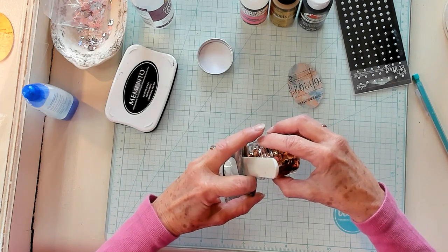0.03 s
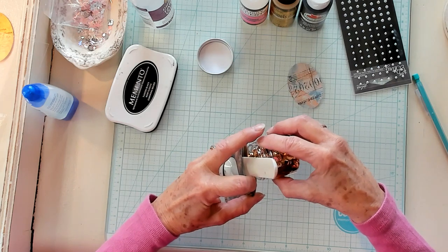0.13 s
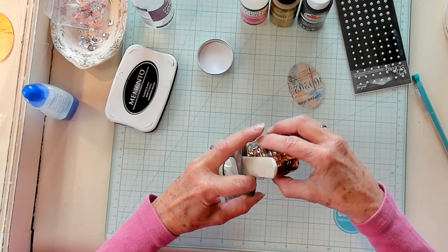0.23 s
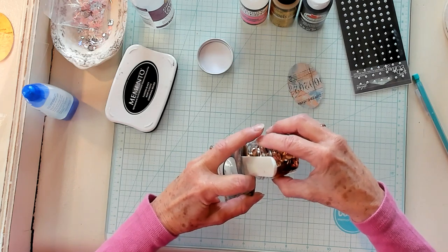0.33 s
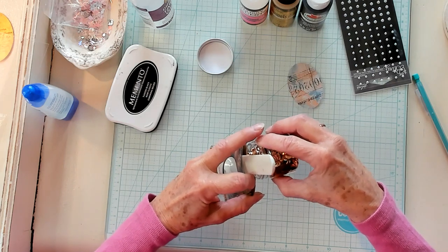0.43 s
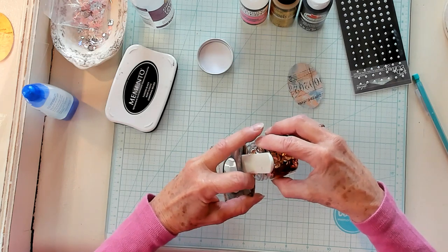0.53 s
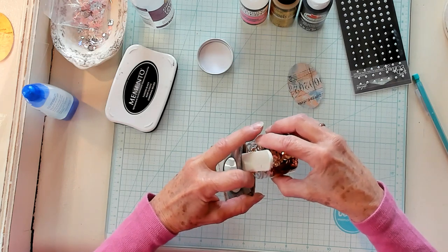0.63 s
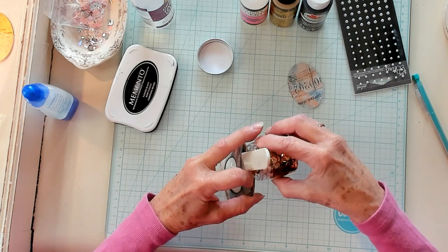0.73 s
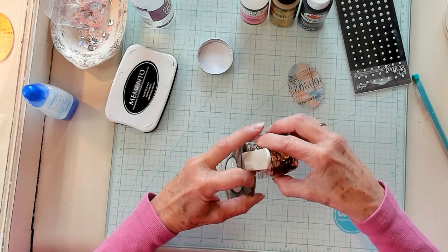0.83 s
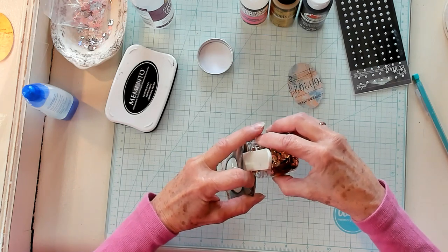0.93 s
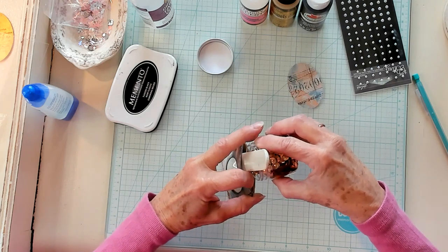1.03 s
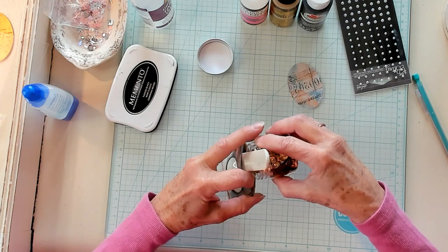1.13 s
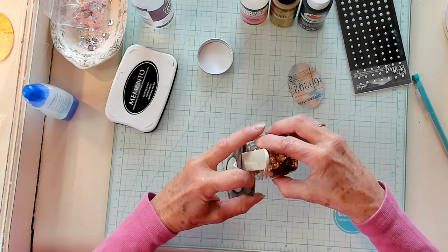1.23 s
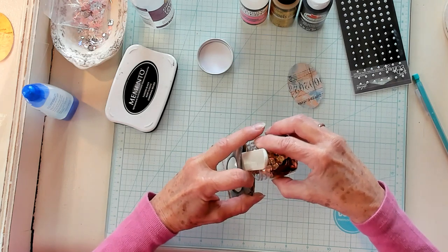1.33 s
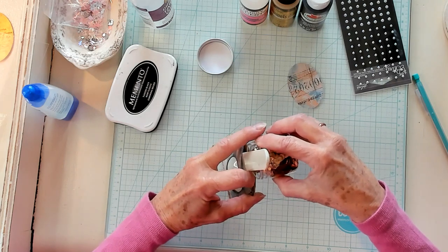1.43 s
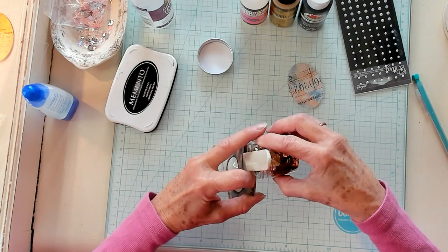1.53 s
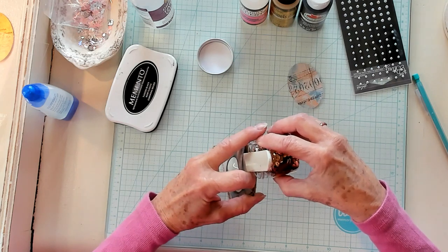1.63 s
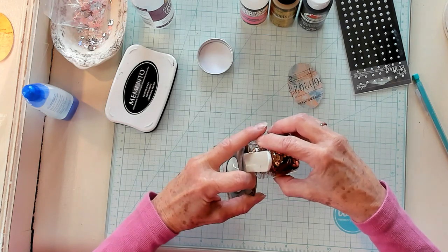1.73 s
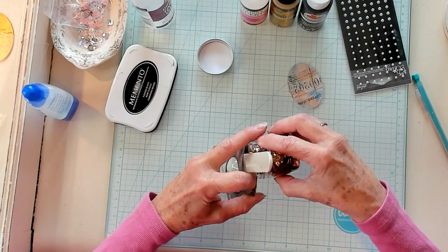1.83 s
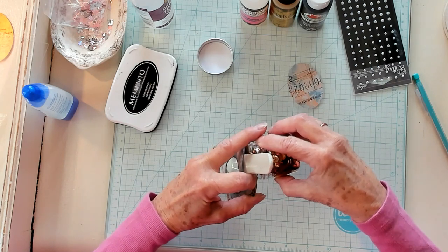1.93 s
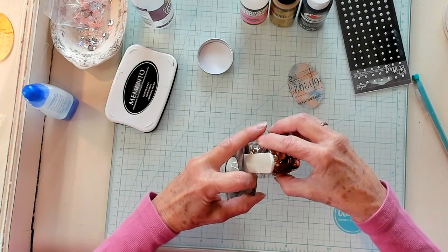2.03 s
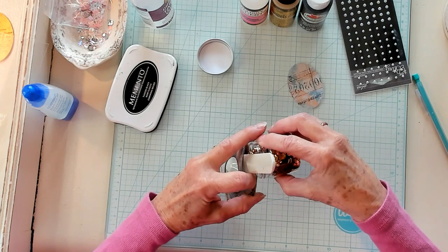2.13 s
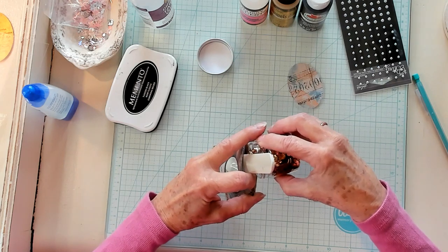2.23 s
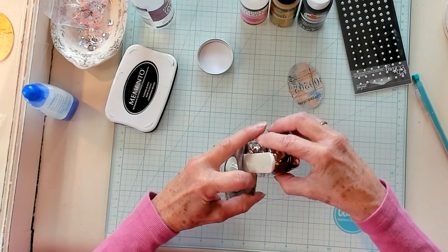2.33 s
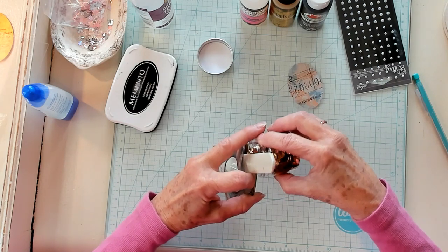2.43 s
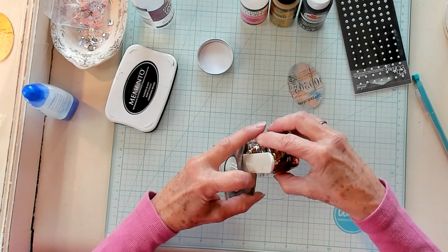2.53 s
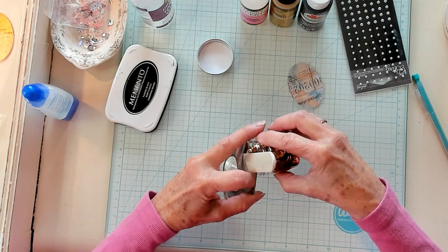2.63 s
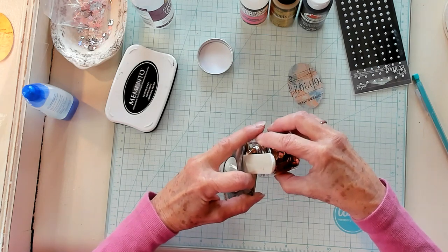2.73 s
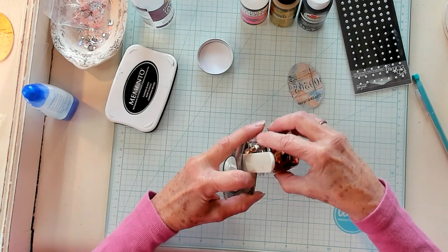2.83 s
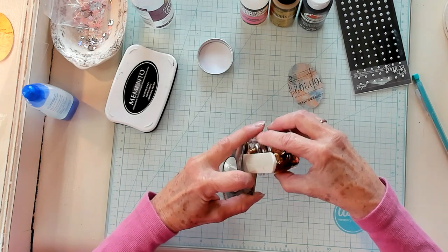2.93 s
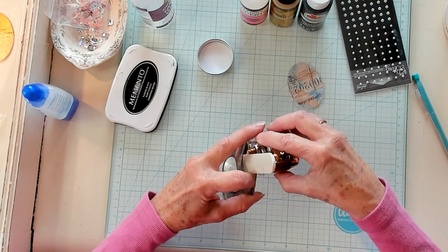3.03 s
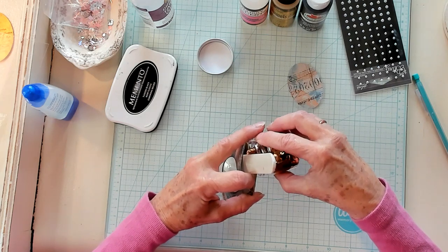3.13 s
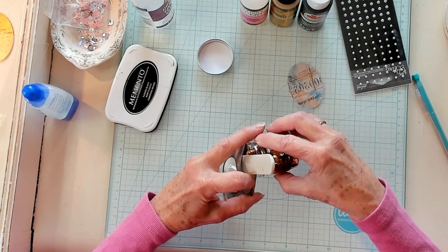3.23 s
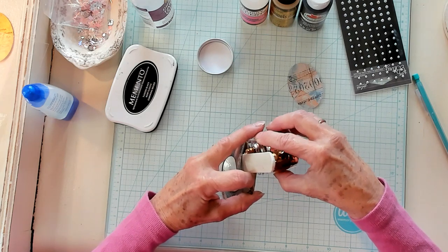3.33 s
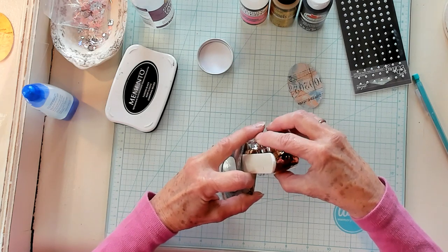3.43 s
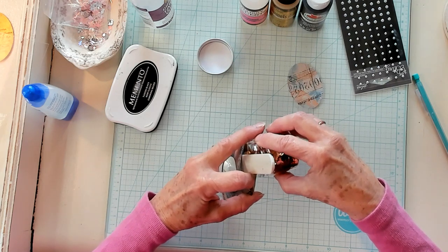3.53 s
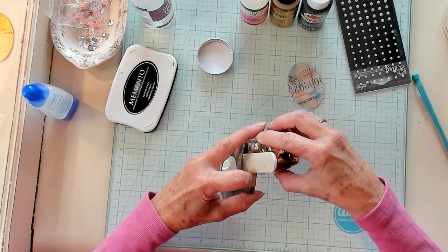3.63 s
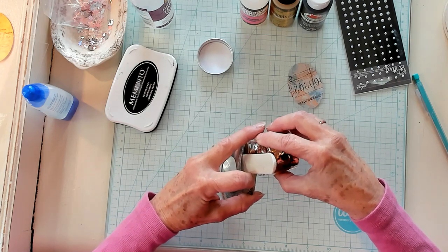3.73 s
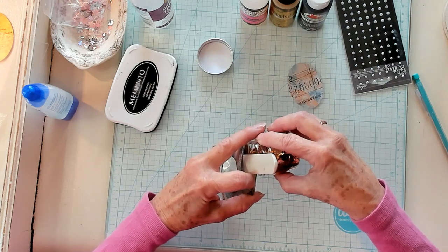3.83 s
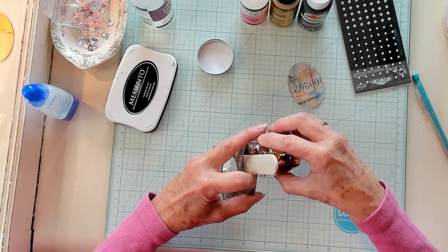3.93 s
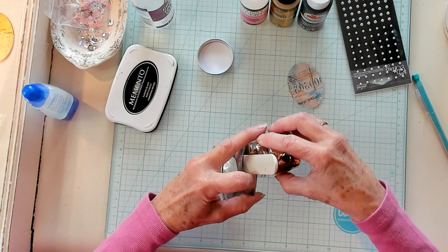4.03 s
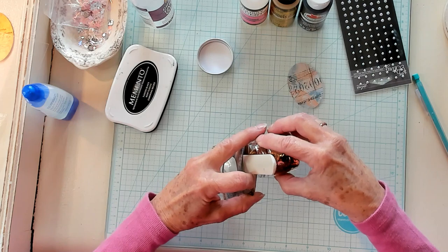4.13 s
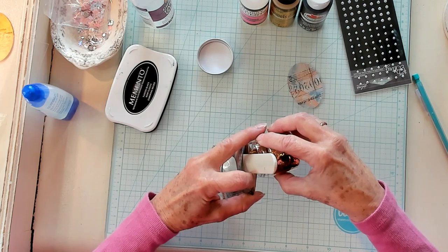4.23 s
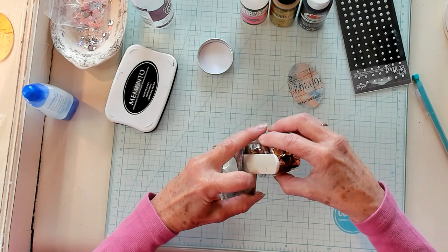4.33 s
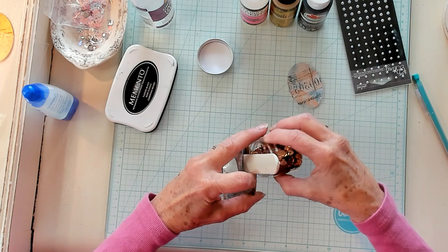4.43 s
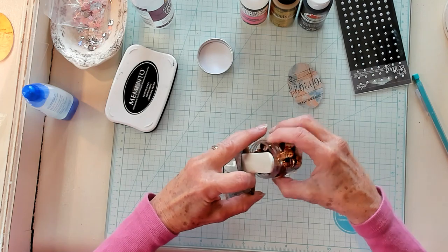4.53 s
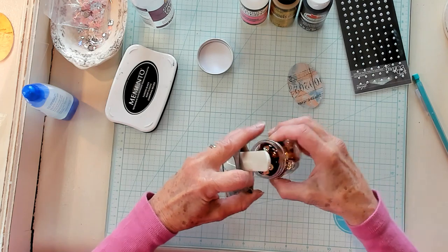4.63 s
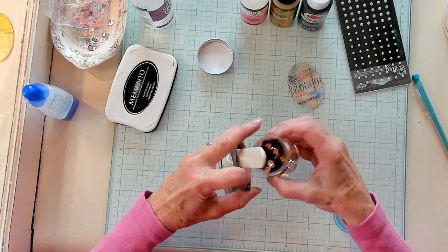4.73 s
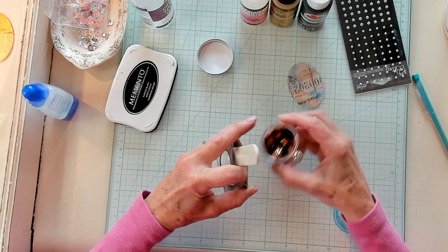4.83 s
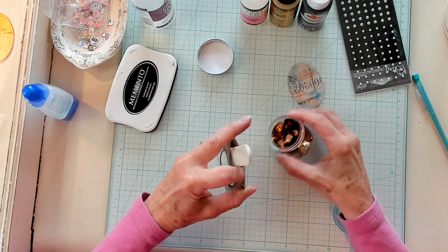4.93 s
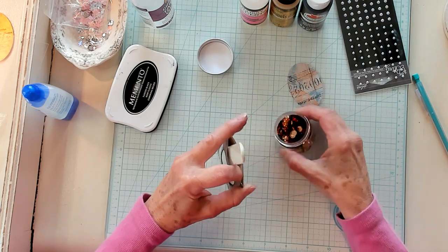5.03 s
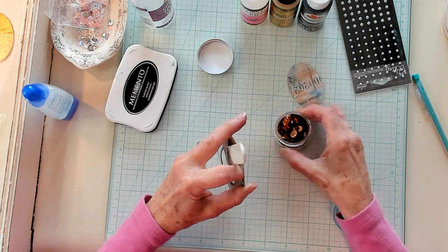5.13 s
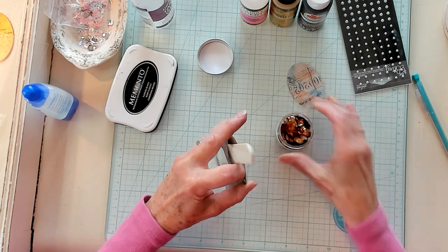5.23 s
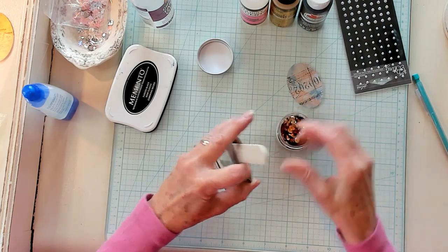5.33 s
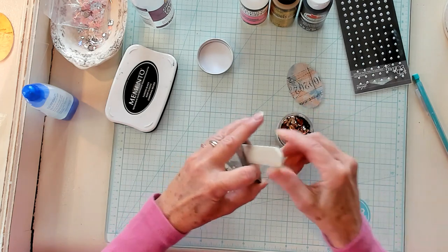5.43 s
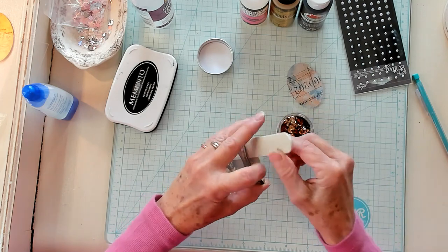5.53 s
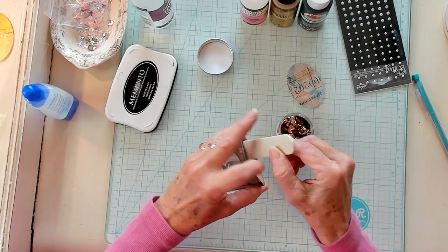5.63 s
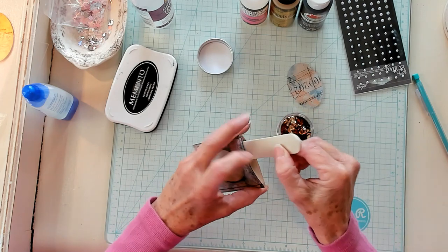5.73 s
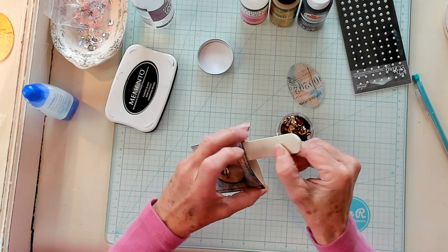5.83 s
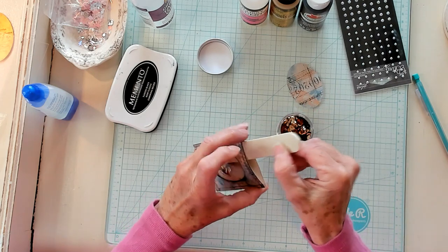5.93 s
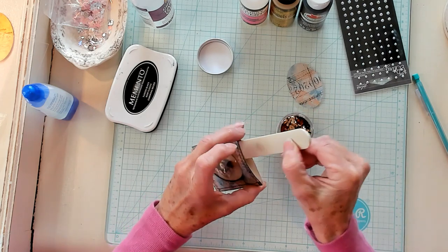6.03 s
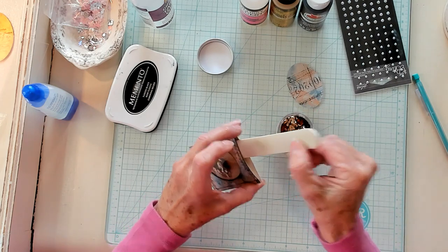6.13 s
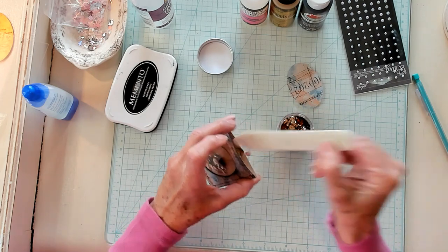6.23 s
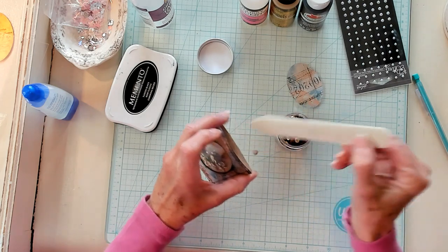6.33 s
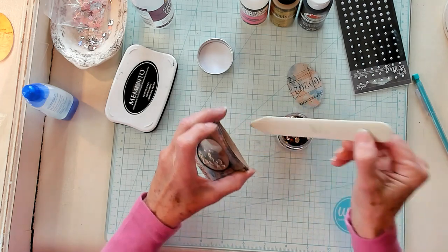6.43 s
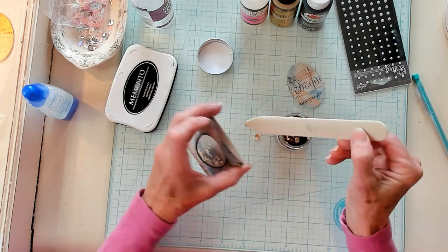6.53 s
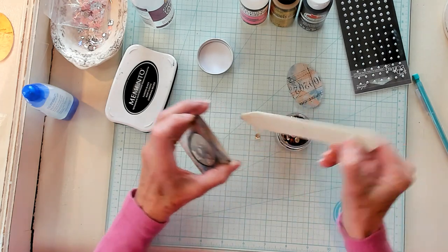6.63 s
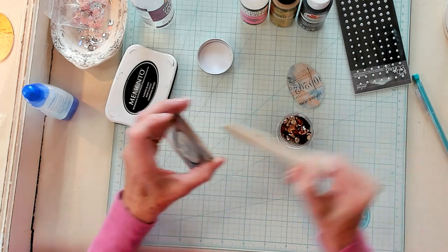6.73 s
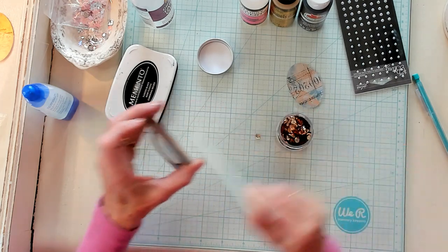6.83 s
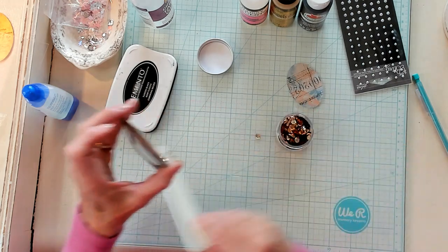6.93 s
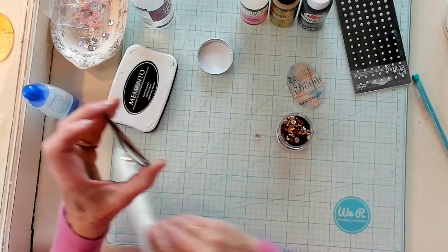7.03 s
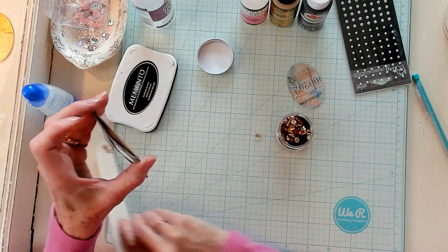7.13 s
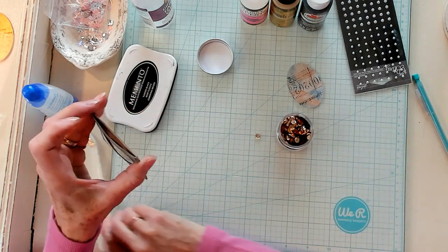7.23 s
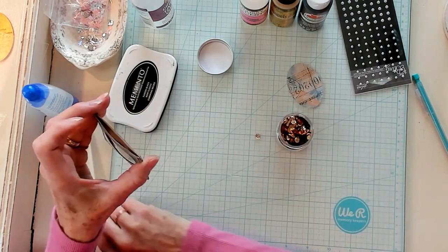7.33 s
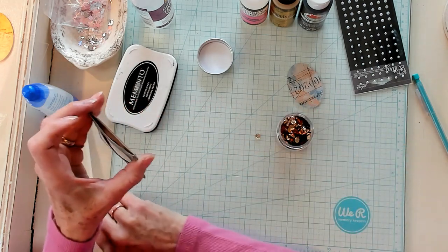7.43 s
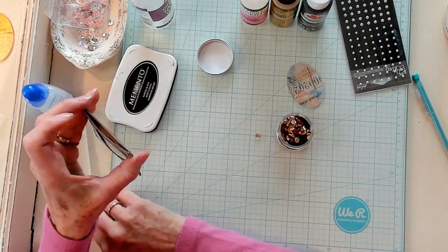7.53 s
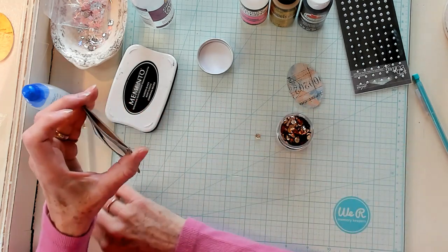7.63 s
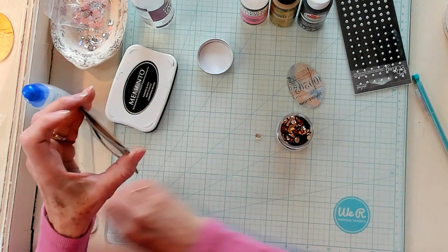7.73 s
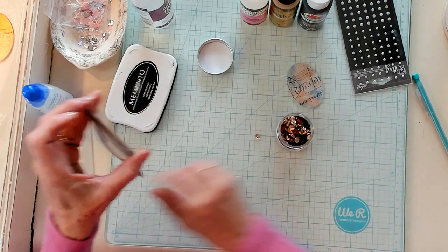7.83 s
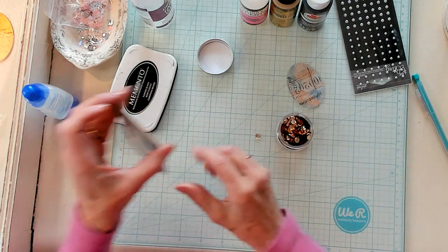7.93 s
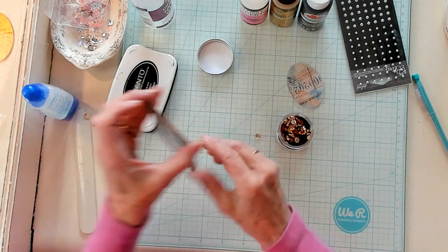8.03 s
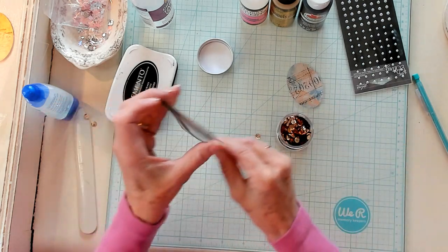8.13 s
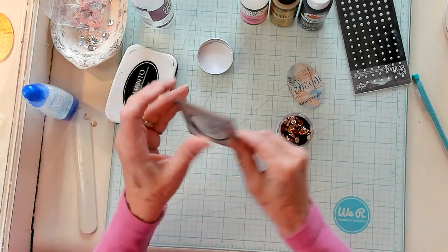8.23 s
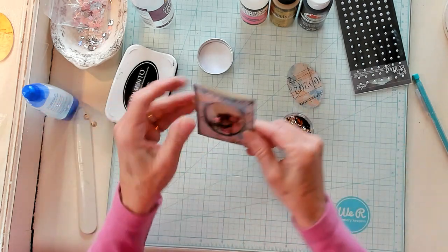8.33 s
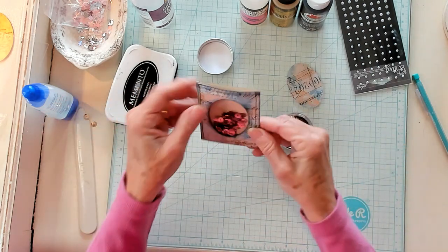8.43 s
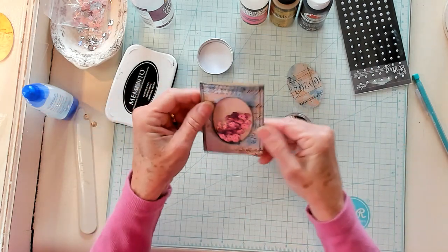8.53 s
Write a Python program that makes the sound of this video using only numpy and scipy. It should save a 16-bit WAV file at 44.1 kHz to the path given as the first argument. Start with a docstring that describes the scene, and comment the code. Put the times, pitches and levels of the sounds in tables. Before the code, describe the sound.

Sequins click and slide into a paper pocket, followed by a jar's knock, crinkling paper and a brief bright clatter.

```python
"""A desk in a small, faintly humming room, one microphone close by. For four seconds sequins are shaken
from a small jar into a paper pocket in short slides, each impact clicking and ringing jar and pocket.
Near 5 s the jar knocks down on the desk mat and a few last sequins tick. Paper fibres slip and creases
snap as a bone folder is drawn out of the pocket. From 7 s the folder taps, slides and clatters to rest,
ringing itself and the desk; then the paper rustles again."""
import sys
import numpy as np
from scipy import signal
from scipy.fft import rfft, irfft
from scipy.io import wavfile
from scipy.ndimage import uniform_filter1d

SR = 44100
rng = np.random.default_rng(int(sys.argv[2]) if len(sys.argv) > 2 else 0)


def file_out(sig):
    """Save sig as 16-bit WAV at sys.argv[1]."""
    # one column per channel
    cols = np.atleast_2d(sig).T
    # limit, then scale
    lim = np.clip(cols, -1, 1)
    pcm = np.round(lim * 32767).astype(np.int16)
    wavfile.write(sys.argv[1], SR, pcm)


N = 378730

# spectral outlines: f/Hz, level/dB
HUM_SPECTRUM = [(12, -85), (20, -63.5), (48, -41), (72, -15.5), (107, -22.5), (130, -6), (198, -12),
                (234, -5), (310, -14), (410, -17), (1660, -22.5), (3740, -29), (16000, -42)]
CLICK_SPECTRUM = [(12, -82.5), (20, -15.5), (1090, -28.5), (1260, -27.5), (1570, -23.5), (2200, -3),
                  (2390, -13.5), (3340, -2.5), (7730, -9), (16000, -27.5)]
JAR_CLATTER_SPECTRUM = [(60, -53), (200, -21), (500, -4.5), (1100, -2), (2500, -19.5), (5000, -30.5),
                        (16000, -43.5)]
FOLDER_CLATTER_SPECTRUM = [(100, -45), (700, -10.5), (1700, 0), (3300, -1.5), (6000, -10.5), (16000, -33)]
FIBRE_SPECTRUM = [(100, -42.5), (1500, -17), (3500, 4), (7000, 2.0), (16000, -22)]
# ringing modes: f/Hz, level/dB, t60/s
DESK_MODES = [(304, -14, 0.16), (540.4, 2, 0.1), (610, 2.5, 0.084), (696, -1.5, 0.17), (932, -3, 0.079),
              (1184, 5.5, 0.02)]
FOLDER_MODES = [(1665, -11.5, 0.077), (1763, 1.5, 0.036), (2016, 3.5, 0.044), (2900, -1, 0.04),
                (2901, 8, 0.028), (3107, -5.5, 0.037), (3720, -13, 0.019)]
JAR_ON_MAT_MODES = [(330.6, -21.5, .06), (471.8, -24.5, 0.056), (568, -14.5, 0.061), (695, -12, 0.11),
                    (910.4, 0, 0.093), (990, -9, 0.031), (1140, -15.5, 0.013)]
JAR_WALL_MODES = [(1270, -9, 0.0051), (2323, 0.5, 0.0088)]
JAR_AND_POCKET_MODES = [(2162, -1.5, 0.018), (2640, -4, 0.012), (3070, -0.5, 0.019), (7640, -11.5, 0.072)]
MOUTH_AIR_MODE = [(1281, -14, 0.09)]
# fingertips squeaking: middle t/s, level/dB, f/Hz, half-width/s
FINGER_SQUEAKS = [(4.795, -56.5, 1622, 0.0434), (8.51, -60.5, 1560, 0.019)]
# paper and fingers rubbing: start t/s, length/s, level/dB, centre f/Hz
PAPER_RUBS = [(4.35, 0.43, -66.5, 4080), (4.762, 0.11, -56.5, 1770), (4.892, 0.16, -72, 4500),
              (5.36, 0.086, -64, 5800), (5.406, 0.13, -59.5, 4900), (5.592, 0.069, -43, 2250),
              (5.71, 0.098, -55, 3780), (5.835, 0.15, -40.5, 3650), (5.876, 0.14, -39, 4906),
              (5.967, 0.3, -54.5, 5500), (6.221, .1, -47.5, 4700), (6.3, 0.2, -67.5, 4460),
              (7.444, 0.049, -61.5, 1966), (7.951, 0.18, -56.5, 4300), (8.1, .11, -63.5, 4066),
              (8.19, 0.092, -58.5, 4600), (8.383, 0.11, -58, 5830), (8.462, 0.17, -60, 4250)]
# paper creases snapping: t/s, level/dB, ring f/Hz
CREASE_SNAPS = [(4.3624, -36.5, 3670), (4.544, -44.5, 3630), (4.616, -40.5, 6000), (4.8936, -48, 8400),
                (5.3737, -32, 7120), (5.4237, -28.5, 2000), (5.4338, -23.5, 7360), (5.514, -41.5, 2000),
                (5.5963, -18, 1840), (5.6165, -21, 3950), (5.7044, -38, 3320), (5.7282, -27, 3680),
                (5.8496, -32, 3800), (5.9855, -27.5, 6000), (6.0062, -28, 6600), (6.2228, -36, 3770),
                (6.2625, -28.5, 3950), (6.2958, -27.5, 6670), (6.334, -39, 6600), (6.763, -35.5, 3890),
                (7.46, -44.5, 1900), (7.9778, -40.5, 4900), (8.0381, -32.5, 5500), (8.12, -49, 1716),
                (8.1394, -44, 2523), (8.4033, -35, 6300)]
# folder sliding over the desk: start t/s, length/s, level/dB
FOLDER_SLIDE = [(7.12, .22, -54.5)]
# folder touching the desk: t/s, level/dB, relative desk level/dB
FOLDER_BLOWS = [(6.9927, -28, -0.5), (7.0399, -13.5, -22.5), (7.0475, -26, -37), (7.0553, -15.5, -10.5),
                (7.286, -37, -9.5), (7.5388, -48, -3), (7.5675, -7.5, -19.5), (7.5863, -3, -17.5),
                (7.5969, -11.5, -7), (7.6251, -9, -11), (7.657, -19, -9.5)]
# jar base meeting the mat: t/s, level/dB, relative wall level/dB
JAR_BLOWS = [(4.986, -15, -22.5), (5.109, -33.5, 0.5), (5.113, -11.5, -5)]
# single sequins striking jar or pocket: t/s, level/dB, ring f/Hz
SEQUIN_HITS = [(0.1582, -52, 3240), (0.2854, -52.5, 3520), (0.8287, -27.5, 3560), (0.8606, -43, 2980),
               (0.8796, -22, 3120), (1.024, -32.5, 7650), (1.0716, -55, 3340), (1.107, -28, 3570),
               (1.1305, -25.5, 6300), (1.1759, -29, 4600), (1.2402, -34, 3370), (1.2742, -26, 3500),
               (1.4612, -33, 3570), (1.5092, -30, 6470), (1.6448, -47, 6450), (1.7157, -37.5, 6640),
               (1.7541, -36, 3370), (1.781, -26, 3400), (1.9382, -21, 4140), (2.3432, -27.5, 3320),
               (2.3841, -45, 4770), (2.3971, -37, 6240), (2.4196, -35, 4790), (2.44, -29, 3230),
               (2.4695, -35, 3240), (2.5019, -28, 3520), (2.7039, -45.5, 3370), (2.7249, -32.5, 3370),
               (2.7812, -23.5, 3430), (2.8361, -34, 2220), (2.846, -36.5, 4500), (2.8551, -29, 3340),
               (2.9164, -26, 3400), (3.0506, -30, 2230), (3.2442, -42.5, 7250), (3.3669, -31.5, 3550),
               (3.3909, -39, 3350), (3.4133, -20, 2460), (3.4472, -21, 2270), (3.4871, -30.5, 7470),
               (3.532, -21, 3300), (3.7346, -23, 2080), (3.769, -25.5, 2430), (3.8857, -38, 3280),
               (3.9067, -31.5, 2860), (3.9785, -42, 5600), (5.1327, -24, 6430), (5.1985, -29, 9600),
               (5.2135, -35.5, 9700)]
# sequins sliding from the jar: start t/s, length/s, level/dB
SEQUIN_SLIDES = [(-.03, 0.073, -53.5), (.845, 0.16, -41.5), (1.06, 0.066, -50.5), (1.1, 0.11, -40.5),
                 (1.27, 0.083, -50), (1.46, 0.11, -55), (1.775, 0.054, -42.5), (1.81, .12, -37.5),
                 (1.925, .1, -38.5), (2.35, 0.21, -57.5), (2.495, 0.049, -45.5), (2.72, 0.062, -58.5),
                 (2.775, 0.038, -46), (2.84, .25, -44.5), (3.24, 0.084, -69.5), (3.38, 0.19, -43),
                 (3.48, 0.25, -34.5), (3.68, 0.14, -43), (3.885, 0.057, -52.5)]

HUM_DB, ROOM_DB, LATE_DB = -66, -6, -30.5
ROOM_T60_S, ROOM_TREBLE_T60_S, LATE_T60_S = 0.29, 0.23, 0.97
SLIDE_SHAPE, RUB_SHAPE = (0.81, 1.42), (0.7, 1.4)  # exponents of a swell's rise and fall
BOTTOM_HZ, TOP_HZ = 40, 16000


def undb(db):
    """Gain of a level in dB."""
    return 10 ** (np.asarray(db) / 20)


def unit(x):
    """Scale to rms 1."""
    return x / np.sqrt(np.mean(x ** 2))


def peak(x):
    """Scale to peak 1."""
    return x / np.abs(x).max()


def add(out, s, sound):
    """Mix a sound in at time s."""
    i = int(s * SR)
    sound = sound[max(-i, 0):N - i]
    out[max(i, 0):max(i, 0) + len(sound)] += sound


def colour(x, spectrum):
    """Causal filter with the given spectral outline, from the cepstrum of the log gain."""
    hz, db = np.transpose(spectrum)
    size = 2 ** 12
    bin_hz = np.arange(size // 2 + 1) * SR / size
    gain_db = np.interp(np.log(bin_hz + 1), np.log(hz), db)
    cepstrum = irfft(gain_db * np.log(10) / 20)
    cepstrum[1:size // 2] *= 2
    cepstrum[size // 2 + 1:] = 0
    return signal.fftconvolve(x, irfft(np.exp(rfft(cepstrum))))[:len(x)]


def thin(x):
    """Small, light things radiate no bass."""
    return signal.sosfilt(signal.butter(3, 1200, "high", fs=SR, output="sos"), x)


def resonate(x, hz, t60):
    """One damped mode driven by x."""
    pole = np.exp(2j * np.pi * hz / SR) * 1000 ** (-1 / (t60 * SR))
    return signal.lfilter([1], [1, -pole], x).imag


def ring(modes, contact_s, scatter_db=2.0, detune=0.015):
    """The modes take random shares of a short push; peak 1."""
    t = np.arange(SR // 4) / SR
    ringing = 0
    for hz, db, t60 in modes:
        gain = undb(db + scatter_db * rng.standard_normal())
        tuned_hz = hz * (1 + detune * rng.standard_normal())
        ringing += gain * np.sin(2 * np.pi * tuned_hz * t) * 1000 ** (-t / t60)
    return peak(ringing * (1 - np.exp(-t / contact_s)))


def burst(t60, rise_s):
    """Noise that rises fast and dies away: modes too dense to tell apart."""
    t = np.arange(SR // 8) / SR
    return rng.standard_normal(len(t)) * 1000 ** (-t / t60) * (1 - np.exp(-t / rise_s))


def grains(per_s, spread_db, t60):
    """Random impacts, many small and a few large, each a brief scratch of noise; rms 1."""
    sizes = undb(spread_db * np.minimum(rng.standard_exponential(N), 3))
    impacts = sizes * (rng.random(N) < per_s / SR)
    power = signal.lfilter([1], [1, -1000 ** (-2 / (t60 * SR))], impacts ** 2)
    return unit(np.sqrt(power) * rng.standard_normal(N))


def swells(table, rise, fall):
    """Amplitude over time of each row: a quick rise, then a slower run-out."""
    out = np.zeros((len(table), N))
    for row, (start, length, db, *_) in zip(out, table):
        progress = np.linspace(0, 1, int(length * SR))
        add(row, start, undb(db) * peak(progress ** rise * (1 - progress) ** fall))
    return out


def clicks(table, t60, ring_cycles, ring_db):
    """Lone clicks: a dry crack of a few milliseconds with one short ring."""
    out = np.zeros(N)
    for s, db, hz in table:
        noise = burst(t60, rise_s=0.00024)
        crack = peak(colour(noise, CLICK_SPECTRUM))
        ringing = peak(resonate(noise, hz, ring_cycles / hz))
        add(out, s, undb(db) * peak(crack + undb(ring_db) * ringing))
    return thin(out)


def blows(table, modes, other_modes, clatter_spectrum, contact_s, clatter_db, clatter_t60):
    """A hard thing lands: two sets of modes, balanced blow by blow, and a dense clatter."""
    out = np.zeros(N)
    for s, db, other_db in table:
        add(out, s, undb(db) * ring(modes, contact_s))
        add(out, s, undb(db + other_db) * ring(other_modes, contact_s))
        clatter = colour(burst(clatter_t60, rise_s=0.0009), clatter_spectrum)
        add(out, s, undb(db + clatter_db) * peak(clatter))
    return out


def room_tone():
    """Low hum and hiss behind everything; the level wavers a little."""
    drift = uniform_filter1d(rng.standard_normal(N), SR // 8)
    waver_db = 0.3 * unit(uniform_filter1d(drift, SR // 8))
    return unit(colour(rng.standard_normal(N), HUM_SPECTRUM)) * undb(HUM_DB + waver_db)


def reflections(x):
    """Desk and nearby walls throw the sound back to the microphone; the treble dies sooner."""
    t = np.arange(SR // 2) / SR
    noise = rng.standard_normal(len(t))
    low = signal.sosfilt(signal.butter(1, 3000, fs=SR, output="sos"), noise)
    tail = low * 1000 ** (-t / ROOM_T60_S) + (noise - low) * 1000 ** (-t / ROOM_TREBLE_T60_S)
    tail *= (1 - np.exp(-t / 0.0018)) * np.exp(-(t / 0.14) ** 2)  # quick build-up, ever faster fade
    tail += undb(LATE_DB) * thin(noise[::-1]) * 1000 ** (-t / LATE_T60_S)  # a faint echo stays on
    return signal.fftconvolve(x, tail / np.linalg.norm(tail))[:N]


def finger_squeaks():
    """Fingertips squeak softly over a smooth face: short swells of noise in a hollow resonance."""
    t = np.arange(N) / SR
    noise = rng.standard_normal(N)
    out = np.zeros(N)
    for s, db, hz, half_width in FINGER_SQUEAKS:
        hollow = resonate(resonate(noise, hz, t60=.012), hz, t60=.012)
        out += undb(db) * np.exp(-2 * ((t - s) / half_width) ** 2) * unit(hollow)
    return out


def paper_rustle():
    """Dense slips of paper fibres: a broad scratch, and a hump where the gripped sheet resonates."""
    rubs = swells(PAPER_RUBS, *RUB_SHAPE)
    centre_hz = np.array(PAPER_RUBS)[rubs.argmax(axis=0), 3]  # follows the strongest rub
    slips = grains(per_s=810, spread_db=2.5, t60=0.024)
    hump = 0
    for hz in 1300 * 2 ** (np.arange(13) / 5):
        octaves_off = np.abs(np.log2(hz / centre_hz))
        hump += undb(-22 * octaves_off) * unit(resonate(slips, hz, t60=28 / hz))
    scratch = undb(-1) * unit(colour(slips, FIBRE_SPECTRUM))
    return np.linalg.norm(rubs, axis=0) * unit(thin(unit(hump) + scratch))


def paper_creases():
    """Creases in the pocket snap, each with a brief ring."""
    return clicks(CREASE_SNAPS, t60=0.017, ring_cycles=15, ring_db=-1.5)


def folder_scrape():
    """The sliding folder rubs its own modes and all but the lowest of the desk's."""
    slips = grains(per_s=1400, spread_db=3, t60=0.0043)
    desk = sum(undb(db) * unit(resonate(slips, hz, t60)) for hz, db, t60 in DESK_MODES[1:])
    folder = sum(undb(db) * unit(resonate(slips, hz, t60)) for hz, db, t60 in FOLDER_MODES)
    return swells(FOLDER_SLIDE, *RUB_SHAPE)[0] * unit(desk + undb(-5) * folder)


def folder_taps():
    """The bone folder rings brightly as it lands, and the desk thuds under it."""
    return blows(FOLDER_BLOWS, FOLDER_MODES, DESK_MODES, FOLDER_CLATTER_SPECTRUM,
                 contact_s=0.00067, clatter_db=-2.4, clatter_t60=0.12)


def jar_knocks():
    """The jar's base knocks on the mat, and its wall rings briefly."""
    return blows(JAR_BLOWS, JAR_ON_MAT_MODES, JAR_WALL_MODES, JAR_CLATTER_SPECTRUM,
                 contact_s=0.0012, clatter_db=6, clatter_t60=0.093)


def sequin_ticks():
    """Single sequins click, and each click sounds the air in the jar mouth."""
    ticks = clicks(SEQUIN_HITS, t60=0.011, ring_cycles=27, ring_db=-4)
    hz, _, t60 = MOUTH_AIR_MODE[0]
    mouth_air = ticks.std() * unit(resonate(ticks, hz, t60))
    return ticks + undb(-22.5) * mouth_air


def sequin_slides():
    """A patter of sequins: every impact clicks and shakes each mode of jar and pocket by its own amount."""
    flow = np.linalg.norm(swells(SEQUIN_SLIDES, *SLIDE_SHAPE), axis=0)
    fullness = flow / flow.max()
    hits = grains(per_s=860 * np.maximum(fullness, .01) ** 0.19, spread_db=3, t60=0.009)

    def shaken(modes):
        return sum(undb(db) * unit(resonate(hits * rng.standard_normal(N), hz, t60))
                   for hz, db, t60 in modes)

    patter = unit(colour(hits, CLICK_SPECTRUM)) + undb(-9) * shaken(JAR_AND_POCKET_MODES)
    mouth_air = fullness ** 0.93 * shaken(MOUTH_AIR_MODE)  # a fuller stream stirs it more
    return flow * (unit(patter) + mouth_air)


def scene():
    """Everything on the desk is close to the microphone, with the room behind it; mono."""
    close = sequin_slides() + paper_rustle() + folder_scrape() + finger_squeaks()
    close += sequin_ticks() + paper_creases() + jar_knocks() + folder_taps()
    return (close + undb(ROOM_DB) * reflections(close) + room_tone())[None]


def record(dry):
    """The recorder rounds the loudest peaks, thins the deep bass and cuts the top."""
    rounded = np.tanh(1.213 * dry) / 1.428
    thinned = signal.sosfilt(signal.butter(1, BOTTOM_HZ, "high", fs=SR, output="sos"), rounded)
    return signal.sosfilt(signal.ellip(10, .2, 70, TOP_HZ, fs=SR, output="sos"), thinned)


dry = scene()
out = record(dry)
file_out(out)
```